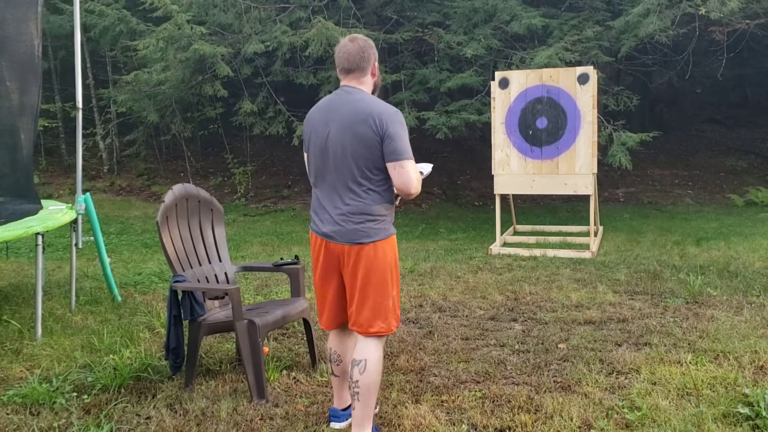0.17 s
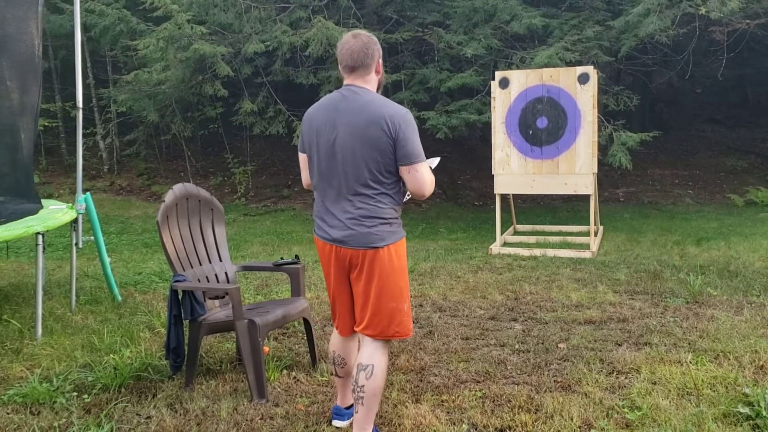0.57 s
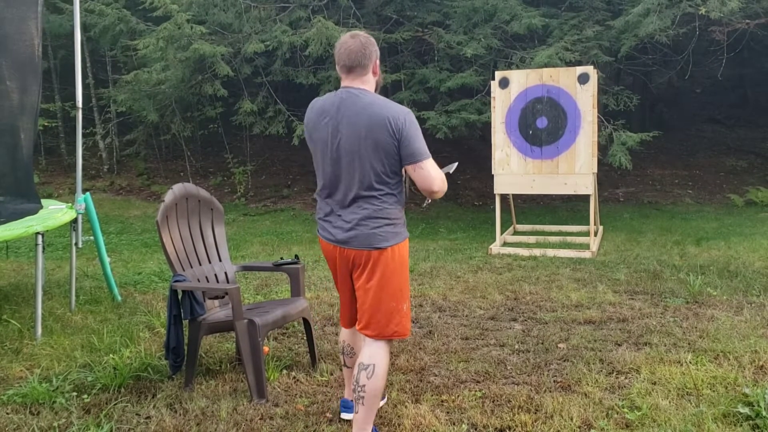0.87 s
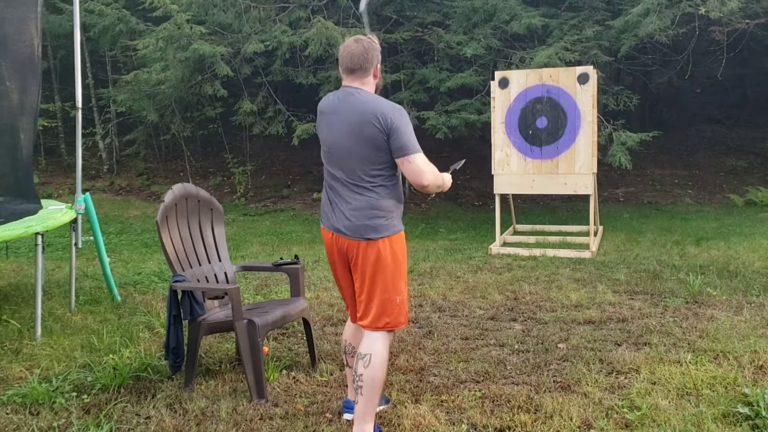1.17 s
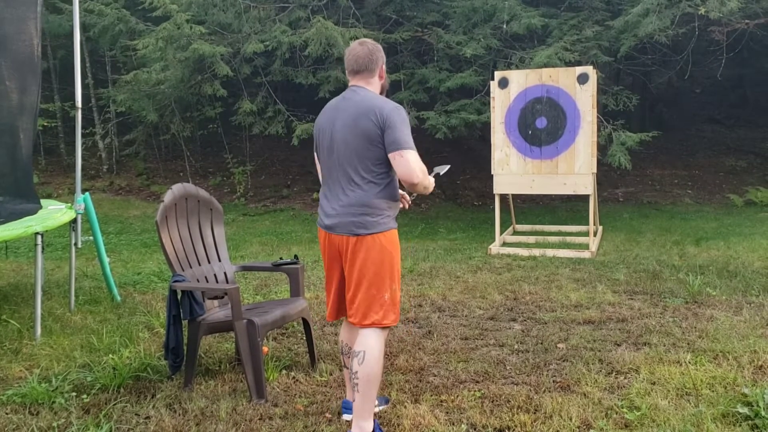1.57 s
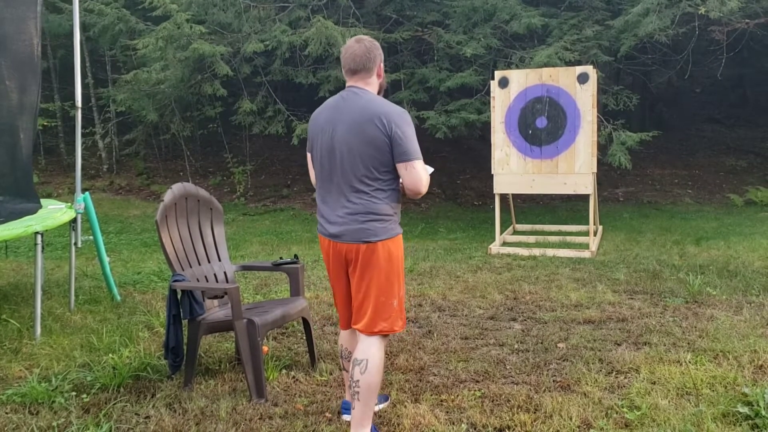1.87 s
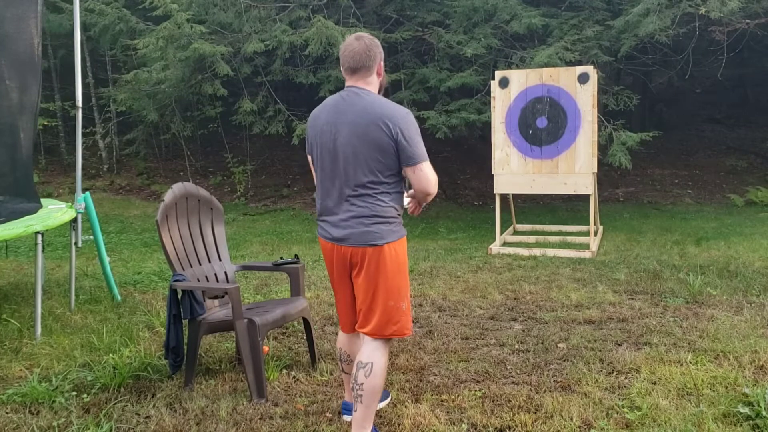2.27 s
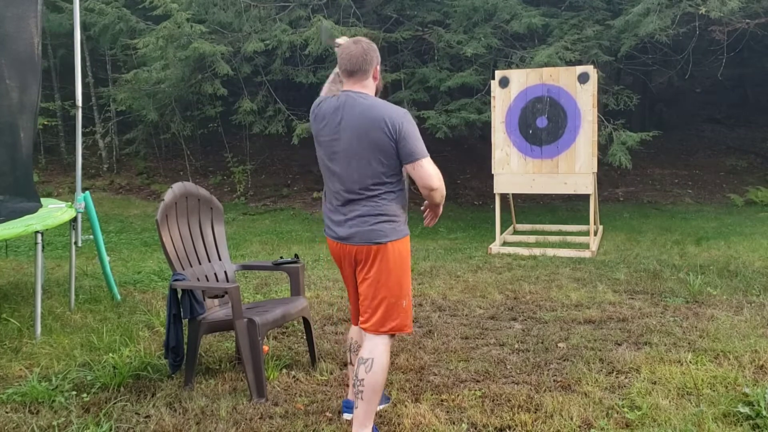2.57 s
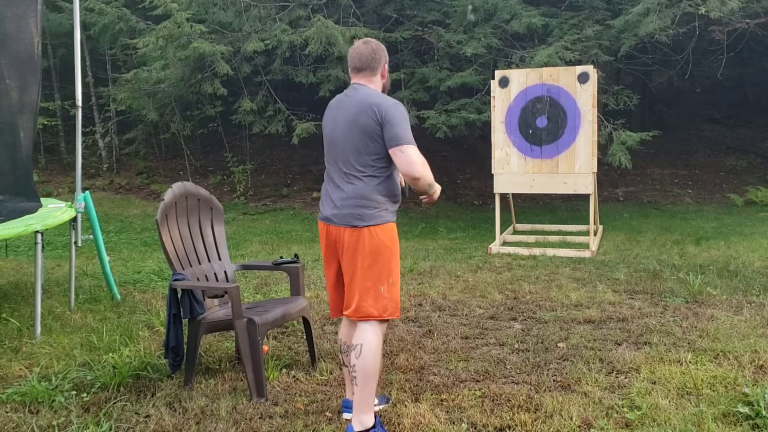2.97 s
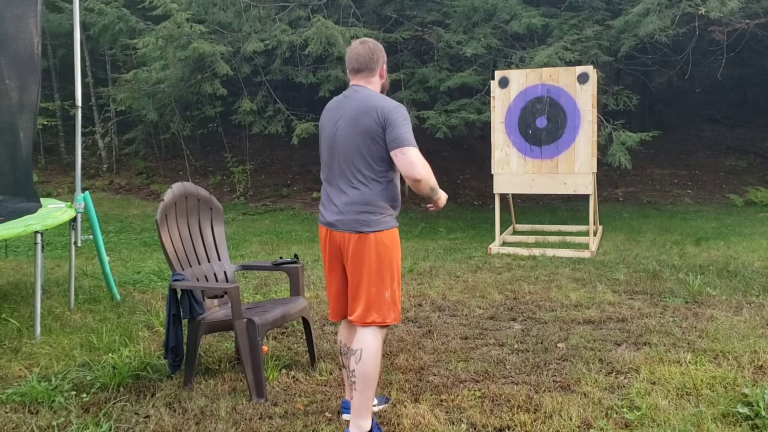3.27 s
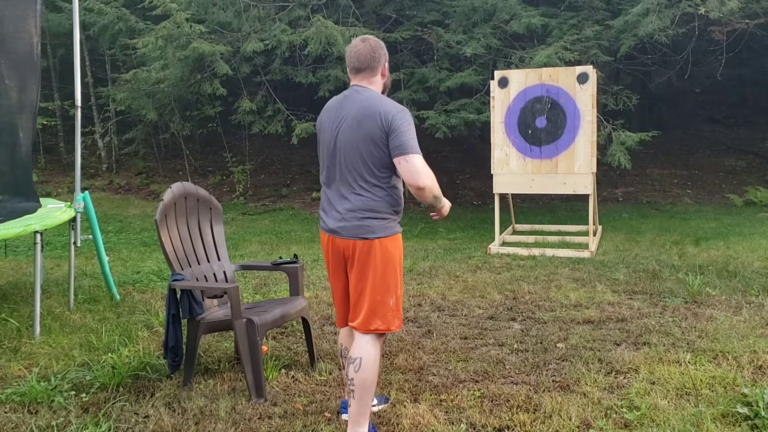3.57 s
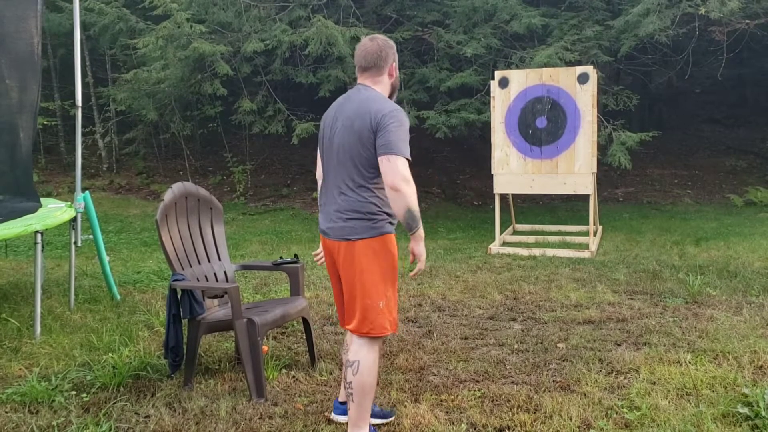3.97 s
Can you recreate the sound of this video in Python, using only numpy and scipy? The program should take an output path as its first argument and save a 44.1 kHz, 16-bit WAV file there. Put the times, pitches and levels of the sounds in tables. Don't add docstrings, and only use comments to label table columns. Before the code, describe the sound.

A quiet backyard bordered by firs, captured by a phone a few metres from the target: low distant traffic wash, a very thin trembling insect band and occasional tiny bird peeps. At about 0.27 s the first axe hits planks with a bright, mid-heavy crack and quick low rock of the stand. Spare blades clink and scrape from 0.1 to 0.55 s, the clearest chinks around 0.5 s. Cloth rustles and a soft arm swish rise near 1.0-1.3 s, with small snaps and steps around 1.4-1.6 s. At 2.04 s the second axe lands, a deeper thud with a short handle hum and faint lingering steel ring. A stronger swish at 2.65 s, then rustle and a step near 2.9 s. Chirps sound around 3.25-3.5 s. At 3.52 s the third axe strikes in several rapid contacts, duller and longer. Trees scatter each blow's echo; faint rustles and chirps close around 4 s.

```python
import sys
import numpy as np
from scipy import signal
from scipy.fft import rfft, irfft
from scipy.io import wavfile
from scipy.ndimage import uniform_filter1d

SR = 44100
rng = np.random.default_rng(int(sys.argv[2]) if len(sys.argv) > 2 else 0)


def rack_gain(trim_db):
    fader = np.asarray(trim_db, float)
    return 10 ** (fader / 20)


def materialize(psi):
    bounded = np.clip(np.atleast_2d(psi).T, -1, 1)
    quanta = np.round(bounded * 32767).astype(np.int16)
    wavfile.write(sys.argv[1], SR, quanta)


N = 181603


def evened(x):
    return x / np.sqrt(np.mean(x ** 2) + 1e-20)


def noise(size=N):
    return rng.standard_normal(size)


def wander(size, smooth_samples):
    return evened(uniform_filter1d(noise(size), smooth_samples))


def read(points, hz):
    f, value = np.transpose(points)
    return np.interp(np.log(hz + 1), np.log(f + 1), value)


def add(mix, start_s, sound):
    part = mix[round(start_s * SR):][:len(sound)]
    part += sound[:len(part)]


def coloured(x, spectrum):
    gain = rack_gain(read(spectrum, np.fft.rfftfreq(len(x), 1 / SR)))
    return evened(irfft(rfft(x) * gain, len(x)))


def filtered(x, hz, kind="low"):
    return signal.lfilter(*signal.butter(2, hz, kind, fs=SR), x)


def resonate(x, hz, width_hz):
    return signal.lfilter(*signal.iirpeak(hz, hz / width_hz, SR), x)


def ring(modes, flip=-1.029):
    t = np.arange(SR)[:, None] / SR
    hz, level_db, t60_s = np.transpose(modes)
    fade = rack_gain(level_db - 60 * t / np.clip(t60_s, 0.005, 1.6))
    return (fade * np.sin(2 * np.pi * hz * t) * flip ** np.arange(len(hz))).sum(1)


def swell(peak_s, level_db, rise_s, fall_s):
    late = np.arange(N) / SR - peak_s
    edge_fall_db = 17
    return rack_gain(level_db - edge_fall_db * np.maximum(-late / max(rise_s, 0.01), late / max(fall_s, 0.01)))


def tree_echoes(x, decays, gap_s=0.0099):
    taps = np.zeros(SR)
    at = np.arange(round(gap_s * SR), SR - 20, 20)
    taps[at + rng.integers(0, 20, len(at))] = rng.choice([-1., 1.], len(at))
    hz, t, z = signal.stft(taps, SR, nperseg=256)
    fade = rack_gain(-60 * t / read(decays, hz)[:, None])
    tail = signal.istft(z * fade, SR, nperseg=256)[1]
    return signal.fftconvolve(x, tail / np.linalg.norm(tail))[:N]


# pitch_hz, density_db [dB per Hz]
TRAFFIC_WASH = [(90, 0.5), (250, -11), (400, -5.5), (550, -9.5), (800, -4.5), (1200, -13.5), (2000, -28.5),
                (3600, -43.5), (4800, -35.5), (11000, -32.5), (14200, -46), (15800, -71)]
# pitch_hz, density_db [dB per Hz]
TRAFFIC_RUMBLE = [(15, -59), (28, -33.5), (40, -8.5), (52, 0), (75, -10), (120, -17.5), (200, -23.5),
                  (400, -51)]
# pitch_hz, width_hz, level_db
INSECTS = (4750, 1000, -73.5)
# peak_s, level_db, rise_s, fall_s
STEPS = [
    (1.04, -58, .1, 0.038),
    (1.37, -47, 0.31, 0.055),
    (1.499, -41.5, 0.058, 0.027),
    (1.64, -55.5, 0.03, 0.35),
    (2.79, -51, 0.046, 0.055),
    (2.933, -36.5, 0.043, 0.041),
    (3.07, -48.5, 0.13, 0.079),
]


def yard():
    wash_db, rumble_db, rumble_swell_db, tremble_db = -55, -54.5, -2.5, 2.5
    wash = rack_gain(wash_db) * coloured(noise(), TRAFFIC_WASH)

    drift_db = rumble_swell_db * wander(N, 6000)
    rumble_gain = rack_gain(rumble_db + drift_db) + sum(swell(*step) for step in STEPS)
    rumble = rumble_gain * coloured(noise(), TRAFFIC_RUMBLE)

    hz, width_hz, level_db = INSECTS
    band = evened(resonate(resonate(noise(), hz, width_hz), hz, width_hz))
    insects = rack_gain(level_db + tremble_db * wander(N, 900)) * band
    return wash + rumble + insects


def glide(length_s, start_hz, end_hz, level_db, octave_db=-60, fifth_db=-60):
    size = round(length_s * SR)
    turn = 2 * np.pi * np.cumsum(np.linspace(start_hz, end_hz, size)) / SR
    note = np.sin(turn) + rack_gain(octave_db) * np.sin(2 * turn) + rack_gain(fifth_db) * np.sin(3 / 2 * turn)
    flutter = 1 + 0.5 * np.sin(2 * np.pi * 55 * np.arange(size) / SR)
    return rack_gain(level_db) * flutter * note * signal.windows.tukey(size, 0.6)


# start_s, length_s, start_hz, end_hz, level_db
PEEPS = [(0.0743, 0.0045, 2710, 2560, -50), (0.0785, 0.009, 2800, 1710, -47),
         (0.082, 0.011, 3480, 2300, -58), (0.107, 0.013, 2560, 2410, -59),
         (3.256, 0.013, 10900, 9400, -59.5), (2.411, 0.01, 8730, 7000, -70), (3.931, .025, 1400, 2140, -56),
         (3.958, 0.013, 2460, 2850, -86), (4.051, 0.012, 2130, 2000, -57), (4.068, 0.0056, 2000, 2110, -55),
         (4.079, 0.0049, 1930, 2350, -51.5), (4.104, 0.015, 1770, 1940, -49.5)]
# start_s, length_s, start_hz, end_hz, level_db
CHIRPS = [(2.226, 0.062, 5210, 5330, -57.5), (2.434, 0.025, 5160, 5170, -53.5),
          (2.448, .014, 5080, 4480, -62), (2.283, 0.047, 5270, 5220, -64), (3.224, 0.016, 5400, 5770, -61),
          (3.236, .02, 5720, 5670, -62.5), (3.27, 0.027, 5610, 5660, -65), (3.327, 0.046, 5620, 5600, -75),
          (3.326, 0.026, 4600, 4600, -72), (3.366, 0.023, 4730, 4540, -72.5), (3.422, .02, 4750, 4570, -70),
          (3.25, 0.018, 5590, 4820, -58.5), (3.443, 0.022, 5180, 5460, -61), (3.48, .02, 5320, 5300, -66),
          (3.643, 0.023, 5200, 5130, -58.5), (4.051, 0.02, 5300, 5220, -56), (4.075, .025, 5200, 5150, -61)]
# pitch_hz, t60_s
FIRS = [(4000, 0.34), (12000, 0.28)]


def birds():
    near_echo_db, far_echo_db = -26, -3
    near, far = np.zeros(N), np.zeros(N)
    for start_s, *note in PEEPS:
        add(near, start_s, glide(*note))
    for start_s, *note in CHIRPS:
        add(far, start_s, glide(*note, octave_db=-8.5, fifth_db=-18))
    near_echo = rack_gain(near_echo_db) * tree_echoes(near, FIRS)
    far_echo = rack_gain(far_echo_db) * tree_echoes(far, FIRS)
    return near + near_echo + far + far_echo


# pitch_hz, density_db [dB per Hz]
CLOTH_HISS = [(2060, -22.5), (3500, -36), (4720, 12), (6500, 11.5), (8690, 12), (14000, 11), (15500, -10.5),
              (16000, -13)]
# peak_s, hiss_db, coarse_over_hiss_db, rise_s, fall_s
RUSTLES = [(0.077, -65.5, 5, 0.042, 0.071), (.71, -71, -5, 0.18, 0.058), (1.04, -68.5, 3.5, 0.27, 0.14),
           (1.173, -60, 4.5, 0.078, 0.06), (1.299, -58.5, 3.5, 0.034, 0.15), (1.44, -70, 2.5, 0.047, .14),
           (1.64, -71, -1, 0.061, 0.29), (1.92, -80, -16, 0.05, .08), (2.3, -82, 8, 0.15, .1),
           (2.68, -69.5, 2, 0.41, .07), (2.794, -60.5, 4, 0.061, 0.066), (2.93, -58, 2, 0.05, 0.079),
           (3.039, -82, 3, 0.076, 0.09), (3.138, -74.5, 6, 0.086, .04), (3.266, -80, 1, .06, .05),
           (3.86, -76, 4, 0.13, .05), (3.938, -66.5, 6.5, 0.024, 0.094), (4.09, -68, 4, 0.11, 0.063)]


def clothes():
    hiss_gain = sum(swell(s, db, *edges) for s, db, over_db, *edges in RUSTLES)
    coarse_gain = sum(swell(s, db + over_db, *edges) for s, db, over_db, *edges in RUSTLES)
    rub = rack_gain(2.0 * wander(N, 120)) * noise()
    coarse = evened(resonate(resonate(rub, 2700, 2000), 2700, 2000))
    return 1.66 * hiss_gain * coloured(rub, CLOTH_HISS) + coarse_gain * coarse


# peak_s, level_db, rise_s, fall_s
SWISHES = [
    (.078, -63, .05, 0.19),
    (1.03, -56, 0.32, 0.1),
    (1.314, -62.5, 0.18, 0.13),
    (1.681, -64.5, 0.082, 0.21),
    (2.66, -52, 0.17, 0.058),
    (2.932, -58, 0.055, 0.015),
    (3.266, -59.5, 0.029, 0.066),
    (4.06, -67, 0.11, 0.072),
]


def arm_swishes():
    still_air_db = -72.5
    gain = rack_gain(still_air_db) + sum(swell(*swing) for swing in SWISHES)
    return gain * evened(resonate(resonate(noise(), 1315, 740), 1315, 740))


# start_s, level_db, pitch_hz, decay_cycles
SNAPS = [(0.226, -28, 9000, 0.8), (1.166, -44, 2900, 4.6), (1.294, -35, 2470, 0.43),
         (1.3619, -24, 3180, 0.49), (1.3648, -35.5, 1650, 1.6), (1.365, -32.5, 2620, 0.91),
         (1.375, -38.5, 207, 1.8), (1.379, -34, 2500, 0.71), (1.397, -43, 8000, 1.5),
         (1.48, -45, 9000, 1.5), (1.489, -58, 109, 1.25), (1.634, -27.5, 231, 0.41),
         (2.872, -31.5, 224, 0.28), (2.9259, -33.5, 2330, 2.1), (2.9252, -37, 5030, 5),
         (3.022, -46, 260, 2.4), (3.988, -52, 7500, 8), (4.027, -49, 9000, 2.5), (2.445, -52.5, 2502, 3.3)]


def snaps():
    out, rise_cycles = np.zeros(N), 0.07
    for start_s, level_db, hz, decay_cycles in SNAPS:
        turns = np.arange(2000) / SR * hz
        shape = np.exp(-turns / decay_cycles) * (1 - np.exp(-turns / rise_cycles))
        add(out, start_s, rack_gain(level_db) * np.sin(2 * np.pi * turns) * shape)
    return out


# pitch_hz, level_db, t60_s
BLADES = [(3060, -13, 0.086), (4420, 0.5, 0.086), (4540, -2, 0.06), (5716, -9.5, .08), (4810, -6, .06),
          (7052, -18, .07), (8600, -13, 0.0605), (9400, -41, .08), (9846, -14.5, 0.056), (10710, -32, .07),
          (12700, -24, .07), (11810, -18, .06), (12250, -29, 0.05), (13900, -31, .04)]
# pitch_hz, level_db, t60_s
BLADES_LONG = [(1852, -21, .085), (2046, -21, .08), (3300, -21, .07), (4486, -10, .26), (6442, -13, .3),
               (7757, -12, .11), (8012, -6, .065), (8091, -6, .065), (6450, -15, .2)]
# start_s, level_db, favoured_hz, fall_db [per octave away]
CLINKS = [(.2135, -36, 6000, 6), (.2262, -17, 8140, 32), (.113, -33, 8300, 26), (.3782, -28, 6500, 8),
          (.3872, -27, 8000, 8), (.3947, -36, 5000, 8), (.4366, -20, 6400, 23), (.444, -24, 4720, 12),
          (.4555, -18, 8100, 40), (0.4952, -7.5, 5370, -10), (.5028, -7.5, 8200, 22),
          (.5138, -6, 5220, 4.5), (0.5225, -11.5, 8300, 13)]


def blade_clinks():
    out = np.zeros(N)
    for start_s, clink_db, favoured_hz, fall_db in CLINKS:
        modes = []
        for hz, mode_db, t60_s in BLADES + BLADES_LONG:
            octaves_off = abs(np.log2(hz / favoured_hz))
            modes.append((hz, clink_db - 27.0 + mode_db - fall_db * octaves_off, t60_s))
        add(out, start_s, ring(modes))
    return out


# start_s, end_s, level_db, grit_db, rising_share
SCRAPES = [(0.107, 0.16, -62, -10, 0.93), (0.212, 0.312, -57.5, -4.5, 0.21),
           (0.269, 0.375, -65.5, 6.5, 0.14), (0.351, 0.428, -54, -4.5, 0.64), (0.423, 0.469, -54, -9, 0.18),
           (0.4951, 0.555, -58, 12, 0.11), (0.641, 0.8, -68.5, -7, 0.26), (0.802, 0.886, -70.5, -15, 0.61),
           (1.3, 1.36, -64, -14, .3), (1.86, 1.94, -71, -25, 0.3), (1.89, 1.957, -68.5, -25, .15),
           (1.945, 2.03, -66.5, -17, 0.32), (2.907, 3.007, -62, -18, 0.11)]
SCRAPED = [
    [8250, 5750, 6580, 3660],
    [7890, 8090, 4500, 11400, 9220],
    [6480, 12400, 8850],
    [6540, 5050, 4490, 8750, 7640],
    [4690, 6370, 13900, 10700, 5730],
    [12200, 12100, 12900, 11040],
    [8760, 6450, 5650, 7050, 10500],
    [7870, 4250, 6190],
    [14000, 7800],
    [9000, 4500, 13000, 4800],
    [11400, 5700, 14300],
    [13000, 14300, 4800, 9000, 7200, 10000],
    [6230, 4400, 8000, 14100, 5360],
]


def blade_scrapes():
    width_hz, next_mode_db, other_modes_db = 45, -1.5, -19.5
    out, t = np.zeros(N), np.arange(SR // 3) / SR
    for (start_s, end_s, level_db, grit_db, rising), peaks_hz in zip(SCRAPES, SCRAPED):
        length_s = end_s - start_s
        pressure = np.interp(t / length_s, [0, np.clip(rising, 0.01, 0.9), 1], [0, 1, 0]) ** 1.13
        bumps = rack_gain(3.2 * wander(len(t), 60))
        grit = pressure * bumps * noise(len(t))
        lines = sum(rack_gain(next_mode_db * k) * evened(resonate(grit, hz, width_hz))
                    for k, hz in enumerate(peaks_hz))
        others = sum(evened(resonate(grit, hz, width_hz)) for hz, *_ in BLADES)
        lines += rack_gain(other_modes_db) * others
        broad = evened(resonate(resonate(grit, 7500, 8700), 6100, 6300))
        stroke = evened(lines) + rack_gain(grit_db) * broad
        add(out, start_s, rack_gain(level_db) * stroke * np.sqrt(length_s / t[-1]))
    return out


# start_s, pitch_hz, level_db, rise_s, t60_s
ROCKS = [
    (.28, 73, -16, 0.0073, 0.2),
    (.268, 98.6, -11, 0.0021, 0.1),
    (0.26, 150, -22.5, 0.0028, 0.21),
    (2.05, 75.6, -25, 0.017, 0.31),
    (2.045, 150, -26, .01, 0.35),
    (2.045, 130, -20.5, 0.0031, 0.17),
    (3.53, 65.3, -19, 0.012, 0.29),
    (3.56, 115, -25, 0.0044, 0.15),
]


def rocking_stand():
    out, t = np.zeros(N), np.arange(SR // 2) / SR
    for start_s, hz, level_db, rise_s, t60_s in ROCKS:
        fade = rack_gain(level_db - 60 * t / t60_s) * (1 - np.exp(-t / rise_s))
        add(out, start_s, fade * np.sin(2 * np.pi * hz * t))
    return out


# start_s, then modes of pitch_hz, level_db, t60_s
STUCK_AXE = (2.045, [(1960, -50, 0.72), (2140, -52, 2), (4718, -47, 1.44), (5615, -64, .9),
             (7080, -56, 0.21), (14220, -61, 0.4)])
# start_s, pitch_hz, level_db, t60_s
HANDLES = [
    (2.05, 797, -27, .36),
    (3.53, 888, -44, 1.5),
]


def stuck_axes():
    out = np.zeros(N)
    start_s, modes = STUCK_AXE
    add(out, start_s, ring(modes))
    for start_s, *mode in HANDLES:
        add(out, start_s, ring([mode]))
    return out


def plank_push(planks, level_db, contact_ms, spot_hz):
    favour_db, favour_octaves = 15, 0.4
    modes = []
    for hz, mode_db, t60_s in planks:
        share = np.exp(-(np.log2(hz / spot_hz) / favour_octaves) ** 2)
        modes.append((hz, mode_db + favour_db * (share - 0.5), t60_s))
    push = np.hanning(max(round(contact_ms * SR / 1000), 1) + 2)
    return signal.fftconvolve(-rack_gain(level_db) * push / push.sum(), ring(modes, flip=0.93))


def splitting(spectrum, t60s, level_db, treble_db):
    t = np.arange(SR // 4) / SR
    burst = filtered(coloured(noise(len(t)), spectrum), 800, "high")
    low = filtered(burst, 2000)
    top = filtered(burst, 6000, "high")
    middle = burst - low - top
    low_fade, middle_fade, top_fade = [rack_gain(-60 * t / t60_s) for t60_s in t60s]
    treble = middle * middle_fade + top * top_fade
    onset = 1 - np.exp(-t / 0.0002)
    return rack_gain(level_db) * (low * low_fade + treble * rack_gain(treble_db)) * onset


def axe_hit(planks, blows, crack, crack_db, crack_t60s):
    board, split = np.zeros(N), np.zeros(N)
    for start_s, push_db, contact_ms, treble_db, spot_hz in blows:
        add(board, start_s, plank_push(planks, push_db, contact_ms, spot_hz))
        add(split, start_s, splitting(crack, crack_t60s, push_db + 20.5 + crack_db, treble_db))
    return filtered(board, 283, "high") + split


# pitch_hz, level_db, t60_s
PLANKS = [
    [(340, -4, 0.042), (440, 0, 0.053), (548, 1, 0.056), (724, 2, 0.036), (794, 1, 0.04), (874, -11, 0.18),
     (1047, 2, 0.04), (3820, -22, 0.02), (1410, -22, 0.035), (1728, -7, 0.055), (1950, 2.5, 0.04),
     (3120, -37, 0.23), (2530, -13, .025), (2940, -7, .025)],
    [(153, 8, 0.032), (427, -26.5, .06), (450, 0.5, 0.07), (530, 1, 0.069), (588, -11, 0.063),
     (703, 5, 0.041), (769, 5.5, 0.068), (903, 1.5, 0.13), (1010, -23, .05), (1080, -24.5, 0.05),
     (1830, -3, 0.021), (2200, -13, 0.04), (2555, -16, 0.04), (4800, -23, .03)],
    [(161.1, 9, 0.15), (386, -3, 0.079), (462, -3, 0.059), (510, 7, 0.032), (630, -6, 0.057),
     (699, -3, 0.06), (785, -7, 0.04), (930, -18, 0.045), (1240, -27, 0.032), (1500, -23, 0.038),
     (1690, 3, 0.035), (2140, -26, .05), (2580, -15, 0.02), (3210, -7, .025)],
]
# start_s, push_db, contact_ms, treble_db, spot_hz
BLOWS = [
    [(.2671, -25.5, 0.47, -5, 493), (.2688, -16, 0.2, 8, 780), (.2716, -16.5, 0.3, 3, 730),
     (.2740, -9.5, 0.67, -7, 440)],
    [(2.0352, -13, 0.78, 9, 760), (2.0383, -15.5, 0.046, 13.5, 477), (2.0445, -7.5, 1, -0.5, 450),
     (2.0502, -14, 0.67, -9.5, 630)],
    [(3.5141, -18, 0.3, 21.5, 900), (3.5160, -11.5, 0.18, 14, 493), (3.5200, -13, 0.26, -4.5, 500),
     (3.5250, -10, 0.48, 2.5, 744), (3.5330, -15.5, 0.9, -18, 375)],
]
# pitch_hz, density_db [dB per Hz]
CRACKS = [
    [(120, -25), (220, -17), (404, -17.5), (900, -26), (1270, -31.5), (3040, -31.5), (12500, -47.5),
     (15500, -58)],
    [(150, -28), (290, -23.5), (480, -19.5), (1040, -15.5), (1270, -23), (3760, -31.5), (5130, -40.5),
     (15500, -65.5)],
    [(210, -32), (400, -19.5), (1010, -21.5), (1310, -26), (2980, -37), (4030, -48), (13200, -56.5),
     (15500, -68.5)],
]
CRACK_DB = [-26, -29, -30]
# t60_s under 2 kHz, t60_s 2-6 kHz, t60_s over 6 kHz
CRACK_T60 = [(0.054, 0.026, 0.019), (0.073, 0.035, 0.028), (0.075, 0.026, 0.012)]
# pitch_hz, density_db [dB per Hz]
ECHOES = [
    [(120, -24), (200, 9), (409, 4), (666, -9), (804, -5.5), (1070, -11), (4000, -31), (5200, -62),
     (8800, -120)],
    [(120, -30), (200, 4.5), (609, -15.5), (801, -14.5), (2280, -32), (4840, -38), (5270, -39),
     (12000, -54), (15600, -95.5), (22000, -120)],
    [(120, -4.5), (200, 12.5), (258, -7.5), (390, 1.5), (1200, -19.5), (1460, -15.5), (3000, -33),
     (11900, -42), (15000, -63.5)],
]
TREES_DB = [0.5, 2.5, 5.5]
# pitch_hz, t60_s
TREES = [(100, 0.39), (300, 0.11), (600, 0.97), (1500, 1), (3000, 0.87), (8000, 0.42)]


def target():
    out = np.zeros(N)
    for *hit, colour, echo_db in zip(PLANKS, BLOWS, CRACKS, CRACK_DB, CRACK_T60, ECHOES, TREES_DB):
        out += axe_hit(*hit)
        pulse = coloured(signal.unit_impulse(1024, "mid"), colour) * np.hanning(1024) / 32
        first_contact_s = hit[1][0][0]
        add(out, first_contact_s, rack_gain(echo_db) * tree_echoes(pulse, TREES, gap_s=0.0092))
    return out


def scene():
    background = yard() + birds()
    thrower = clothes() + arm_swishes() + snaps() + blade_clinks() + blade_scrapes()
    axes = rocking_stand() + stuck_axes() + target()
    return (background + thrower + axes)[None]


def band_limit(x):
    return signal.sosfilt(signal.butter(12, 16380, fs=SR, output="sos"), x)


def record(dry):
    thinned = signal.sosfilt(signal.butter(2, 40, "high", fs=SR, output="sos"), dry)
    rounded = 1.05 * np.tanh(thinned / 1.05)
    edge = signal.firwin(127, 15350, window=("kaiser", 8), fs=SR)
    mix = signal.oaconvolve(rounded, edge[None], "same")
    return band_limit(mix)


dry = scene()
out = record(dry)
materialize(out)
```